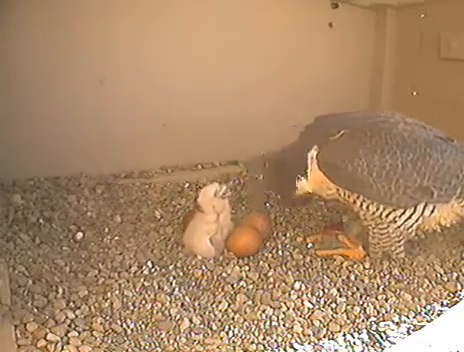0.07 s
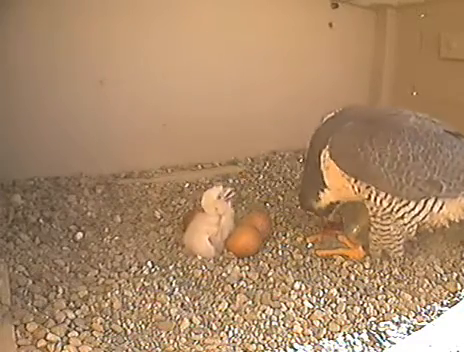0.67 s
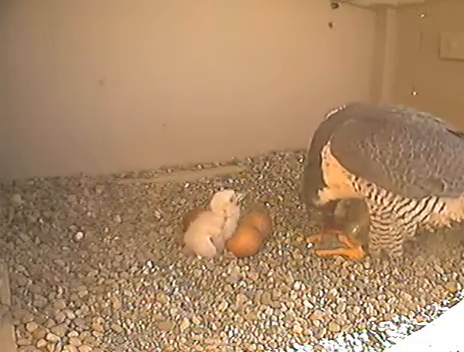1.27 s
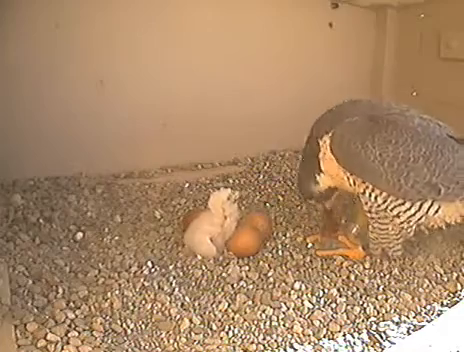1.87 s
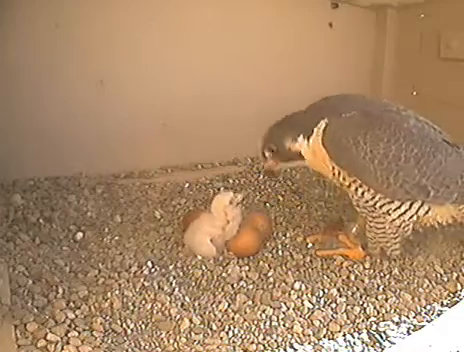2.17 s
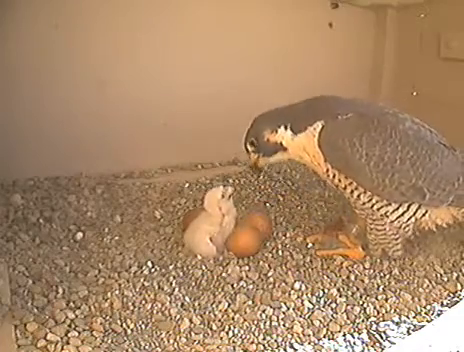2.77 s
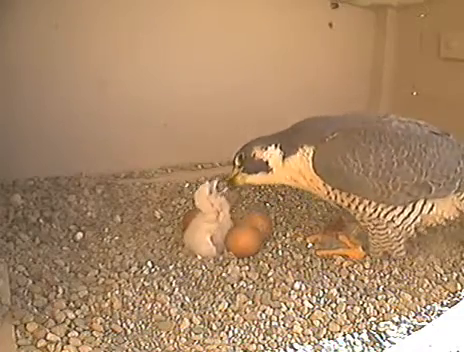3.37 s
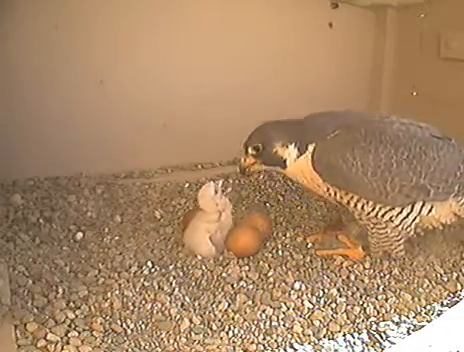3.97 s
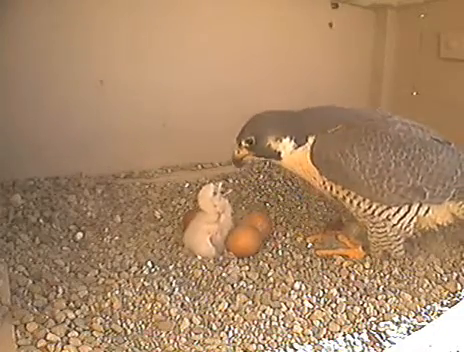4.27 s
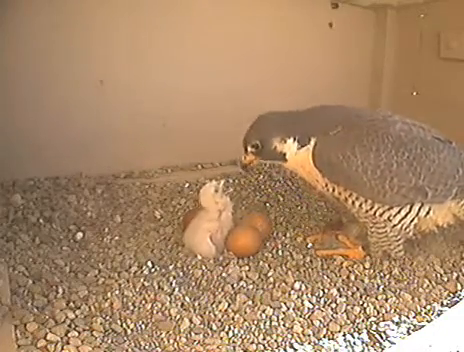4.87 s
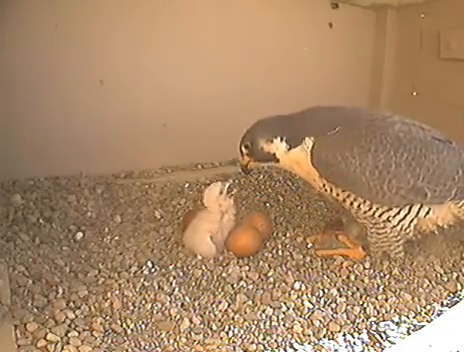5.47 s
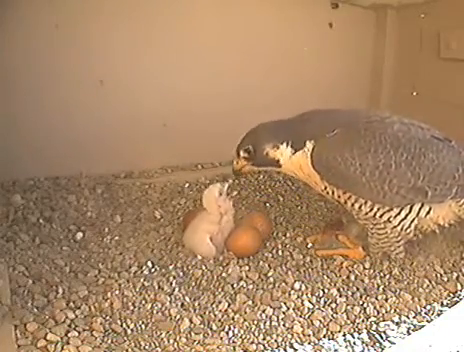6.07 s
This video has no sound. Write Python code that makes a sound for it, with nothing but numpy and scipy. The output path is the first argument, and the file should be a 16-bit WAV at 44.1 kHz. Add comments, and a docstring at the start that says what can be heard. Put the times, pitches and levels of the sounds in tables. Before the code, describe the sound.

A loud, distorted low buzz and wind rumble run throughout, broken by three sharp falcon chups and a chick's faint begging.

```python
"""A falcon gives three sharp, two-voiced chups in a nest box on a tower, heard by an overdriven camera.
Ventilation drone and wind rumble hold the microphone amplifier at its rails: a rasping buzz.
The chups take over the amplifier; her chick's weak, hoarse begging and the swish of plucked
feathers only fizz through at the zero crossings. Faint ticks lie on top."""
import sys
import numpy as np
from scipy import signal
from scipy.fft import rfft, irfft, next_fast_len
from scipy.io import wavfile

SR = 44100
rng = np.random.default_rng(int(sys.argv[2]) if len(sys.argv) > 2 else 0)


def master(y):
    """Save y as 16-bit WAV."""
    cut = np.clip(np.atleast_2d(y).T, -1, 1)
    pcm = np.round(cut * 32767)  # scale
    wavfile.write(sys.argv[1], SR, pcm.astype(np.int16))


N = 274302
T = np.arange(N) / SR

# hiss of chups and feathers: f/Hz, relative density/dB
HISS_SPECTRUM = [(700, -17), (1700, -1), (3000, 6.5), (6000, 4), (8000, 1.5), (10000, 0), (12000, -37)]
# wind gusts: peak t/s, half length/s, rise/dB (wind() scales it by gustiness)
GUST_SWELLS = [(0.19, 0.11, 3), (0.8, 0.048, 5), (1.86, 0.1, 9), (2.48, 0.16, 6.5), (3.62, 0.214, 4.5),
               (4.9, 0.15, 4), (5.5, 0.15, 3)]


def falcon(rasp_hz=560, hiss_db=-14, fray_db=5, beat_db=4, ramp_s=.003):
    """Whistle plus a side tone from the other half of the syrinx; they beat as a low tone, fray to hiss."""
    # per chup: side tone offset below voice/Hz, side tone/dB, third harmonic/dB
    chups = [(232, -14.5, -5), (430, -16, -17), (420, 1, -22)]
    # one curve per chup: t/s, f/Hz, level/dB, roughness, second harmonic/dB
    chup_curves = [
        [(2.577, 1593, 6, .9, -10), (2.587, 1450, 11, 0.66, -12), (2.592, 1153, -9, .7, 7),
         (2.596, 1118, 13, 0.3, 0), (2.607, 1147, 8, 0.4, 12), (2.614, 1083, 7, 0.6, 3),
         (2.623, 1030, 9, 0.5, -1), (2.632, 1008, 3, 0.6, 1), (2.646, 940, 0, 0.5, 3)],
        [(2.952, 1782, 12, .6, 1), (2.959, 1910, 6, .54, -2), (2.968, 2168, 11, 0.4, -13),
         (2.976, 1992, 5.5, 0.5, -4), (2.984, 1852, 4, 0.65, 18), (2.989, 1462, 13, 0.36, 22),
         (2.993, 1400, 12.5, .4, 20), (2.996, 1812, 9, 0.42, -3), (3.017, 1760, 13, 0.3, -17.5),
         (3.022, 1703, 1, 1, -1), (3.028, 1503, 7, 0.6, -14), (3.040, 1625, 5.5, .7, -10),
         (3.066, 1500, -3.5, .95, -16)],
        [(4.534, 1600, 3, .99, -9), (4.549, 1600, 8, 1, -11), (4.559, 1740, -9, 0.8, -6),
         (4.564, 1760, 11, 0.4, 16), (4.574, 1785, 4, .3, 6), (4.581, 1740, 10, .42, -14),
         (4.591, 1730, 8, 0.04, -12), (4.602, 1552, 16, 0.83, -9), (4.612, 1590, 7.5, 0.7, -18),
         (4.622, 1587, 3.5, .95, -5), (4.632, 1491, -14, 1.2, 1)],
    ]
    out = np.zeros(N)
    for (gap_hz, side_db, third_db), curve in zip(chups, chup_curves):
        times_s, *controls = np.transpose(curve)
        at = np.arange(int(times_s[0] * SR), int(times_s[-1] * SR))
        hz, level_db, rough, second_db = (np.interp(T[at], times_s, c) for c in controls)
        whistle = syrinx(hz, second_db, third_db, np.clip(rough, 0, 1), rasp_hz)
        beat = amp(side_db) * np.exp(-2j * np.pi * gap_hz * T[at])
        voice = unit((whistle * (1 + beat)).real)
        low_tone = amp(beat_db) * beat.real * (1 - rough) / (1 + amp(second_db))
        breath = amp(hiss_db + fray_db * rough) * noise(len(at), HISS_SPECTRUM)
        gate = signal.windows.tukey(len(at), 2 * ramp_s * SR / len(at))
        out[at] += amp(level_db) * (voice + low_tone + breath) * gate
    return out


def syrinx(hz, second_db, third_db, rough, rasp_hz):
    """Complex voice of three harmonics, each part clean, part rasp."""
    fundamental = phasor(hz)
    weights = [1, amp(second_db), -amp(third_db)]
    clean = np.sqrt(1 - rough ** 2)
    voice = sum(weight * fundamental ** k * (clean + rough * waver(rasp_hz, len(hz)))
                for k, weight in enumerate(weights, 1))
    return voice / np.sqrt(sum(weight ** 2 for weight in weights))


def chick(arch=0.06, hoarse_hz=600, fall_s=0.015):
    """Airy peeps that swell and break off: hiss over a hoarse voice whose pitch follows its loudness."""
    # begging: peak t/s, rise/s, level/dB, peak f/Hz, voice re hiss/dB
    peeps = [(.706, .045, -14.5, 2780, -7), (2.460, 0.037, -10, 2293, 3), (2.524, 0.023, -15, 2510, 7),
             (3.346, 0.03, -11, 2290, -2), (3.855, 0.03, -12.5, 2930, 2), (4.346, 0.03, -13, 2910, -1),
             (4.857, 0.043, -12.5, 2890, -7), (5.375, .021, -5.5, 3120, -0.5),
             (5.858, .034, -12.5, 2900, -10)]
    # open-beak hiss: f/Hz, relative density/dB
    beak_spectrum = [(1000, -25), (2200, -7), (4000, 0), (5800, 3), (7000, -3.5), (8500, -4.5), (10000, -6),
                     (12000, -32)]
    out = np.zeros(N)
    for peak_s, rise_s, db, hz, voice_db in peeps:
        at = np.flatnonzero((T > peak_s - 2 * rise_s) & (T < peak_s + 2 * fall_s))
        width_s = np.where(T[at] < peak_s, rise_s, fall_s)
        swell = np.exp(-((T[at] - peak_s) / width_s) ** 2)
        pitch_hz = hz * (1 + arch * (swell - 1))
        voice = unit((phasor(pitch_hz) * waver(hoarse_hz, len(at))).real)
        out[at] += amp(db) * swell * unit(amp(voice_db) * voice + noise(len(at), beak_spectrum))
    return out


def feathers():
    """Soft swishes as the falcon plucks her prey."""
    # plucks: peak t/s, half length/s, level/dB
    plucks = [(0.233, 0.0051, -31), (0.377, 0.06, -37), (1.35, 0.038, -24.5), (1.453, 0.026, -24),
              (1.72, 0.017, -32)]
    envelope = swells((peak_s, half_s, amp(db)) for peak_s, half_s, db in plucks)
    return envelope * noise(N, HISS_SPECTRUM)


def nest_box(x, t60_s=0.027, wet_db=-15):
    """Close walls add a very short tail."""
    return x + amp(wet_db) * tail(x, t60_s)


def ventilation(fan_hz=(218.0, 232.5), fan_db=(-2.5, -11), drift_hz=0.795, flutter=0.28,
                duct_db=0.68, lowest_db=1.38):
    """Two fan tones beat over an unsteady duct drone."""
    # wavering duct tones: f/Hz, relative level/dB, bandwidth/Hz
    duct_tones = [(105.36, -11.5, 8.6), (139.8, -22, 7.9), (162.43, -12, 24.9), (197.2, -12, 20),
                  (225.26, -12, 61.4)]
    # drone swells and dips: peak t/s, half length/s, change/dB
    surges = [(0.27, 0.058, 3), (0.85, 0.077, 6), (1.45, 0.091, -2.5), (2.2, 0.25, 3.5), (2.7, 0.086, -10),
              (4.57, 0.064, 7.5), (5.24, 0.096, -20), (5.5, 0.0623, 9), (5.82, 0.063, 2), (6.03, 0.13, 5.5)]
    first_fan = amp(fan_db[0]) * phasor(fan_hz[0] + drift_hz * waver(4.983).real)
    first_fan *= 1 + flutter * waver(18.4).real
    second_fan = amp(fan_db[1]) * phasor(fan_hz[1] + drift_hz * waver(5.6).real)
    gust_db, surge_db = lowest_db + swells(GUST_SWELLS), swells(surges)
    out = first_fan + second_fan
    for hz, db, width_hz in duct_tones:
        swell_db = gust_db if hz < fan_hz[0] / 2 else surge_db  # lowest tone rides on the wind
        out += amp(duct_db + db + swell_db) * waver(width_hz / 2) * np.exp(2j * np.pi * hz * T)
    return np.sqrt(2) * out.real


def wind(base_db=-3.5, gustiness=0.73, eddy_db=0.5, eddy_hz=4):
    """Rumble that swells with gusts and wobbles with small eddies."""
    # wind on the box: f/Hz, relative density/dB
    rumble_spectrum = [(15, -18.5), (30, -6), (48, 1.5), (80, -5), (130, -6.5), (175, -2.5), (250, -10),
                       (330, -14), (550, -21.5), (900, -30), (2000, -46.5), (5000, -47), (10000, -61.5)]
    level_db = base_db + gustiness * swells(GUST_SWELLS) + eddy_db * waver(eddy_hz).real
    return amp(level_db) * noise(N, rumble_spectrum)


def ticks():
    """Faint one-sample clicks."""
    # clicks: t/s, level/dB
    clicks = [(0.6385, -19), (1.895, -29.5), (2.142, -31), (2.252, -29), (3.137, -18.5), (3.579, -26),
              (4.635, -18.5), (4.750, -27.5), (5.134, -16), (5.634, -27.5), (5.830, -26), (5.953, -23.5),
              (6.131, -18.5)]
    out = np.zeros(N)
    for time_s, db in clicks:
        out[round(time_s * SR)] = amp(db)
    return out


def amp(db):
    return 10 ** (np.asarray(db) / 20)


def unit(x):
    return x / np.sqrt(np.mean(abs(x) ** 2) + 1e-20)


def shaped(x, spectrum):
    """Filter by points of f/Hz, gain/dB."""
    hz, db = np.transpose(spectrum)
    bins_hz = np.fft.rfftfreq(len(x), 1 / SR)
    gain_db = np.interp(np.log(bins_hz + 1), np.log(hz), db)
    return irfft(rfft(x) * amp(gain_db), len(x))


def noise(size, spectrum):
    """Coloured noise, power 1."""
    return unit(shaped(rng.standard_normal(size), spectrum))


def waver(rate_hz, size=N):
    """Complex noise, power 1, low-passed at rate_hz."""
    bins_hz = np.fft.fftfreq(next_fast_len(size), 1 / SR)
    white = rng.standard_normal((len(bins_hz), 2)) @ [1, 1j]
    return unit(np.fft.ifft(white / (1 + (bins_hz / rate_hz) ** 4))[:size])


def phasor(hz):
    """Unit phasor along a pitch curve."""
    return np.exp(2j * np.pi * np.cumsum(hz) / SR)


def swells(rows):
    """Sum of bell curves."""
    return sum(height * np.exp(-((T - peak_s) / half_s) ** 2) for peak_s, half_s, height in rows)


def tail(x, t60_s, taps_per_s=4000):
    """Sparse, decaying echoes of random sign."""
    t = T[:SR // 5]
    taps = rng.standard_normal(len(t)) * (rng.random(len(t)) < taps_per_s / SR)
    taps *= (t > .001) * amp(-60 * t / t60_s)
    return signal.fftconvolve(x, taps / np.linalg.norm(taps))[:N]


def lowpass(x, hz):
    """Steep band limit."""
    return signal.oaconvolve(x, signal.firwin(255, hz, window=("kaiser", 9), fs=SR), "same")


def scene():
    """Drone, wind and birds at the microphone; mono."""
    return (ventilation() + wind() + nest_box(falcon() + chick() + feathers()))[None]


def record(dry, drive_db=21.0, rail_db=-24.0, coupling_hz=25, smear_db=-15, smear_t60_s=0.12,
           buzz_edge_hz=10080, band_edge_hz=11250):
    """The amplifier squares the wave off; its coupling capacitor makes the flat tops droop."""
    # faint smear behind each edge of the buzz: f/Hz, gain/dB
    smear_colour = [(100, -5), (300, -2), (700, -3.5), (2000, 2), (5000, 5.5), (10000, 12)]
    # camera response after the overload: f/Hz, gain/dB
    camera_colour = [(30, 0.5), (200, 1.2), (600, 0.5), (1500, 0.55), (3000, -.5), (5000, -2.5), (7500, -6),
                     (10000, -10)]
    oversampled = signal.resample_poly(dry[0], 2, 1)
    squared = signal.resample_poly(np.tanh(amp(drive_db) * oversampled), 1, 2)
    drooped = signal.lfilter(*signal.butter(1, coupling_hz, "high", fs=SR), squared)
    smear = amp(smear_db) * shaped(tail(drooped, smear_t60_s), smear_colour)
    coloured = shaped(amp(rail_db) * (drooped + smear), camera_colour)
    buzz = lowpass(coloured, buzz_edge_hz)
    return lowpass(buzz + ticks(), band_edge_hz)[None]


dry = scene()
out = record(dry)
master(out)
```